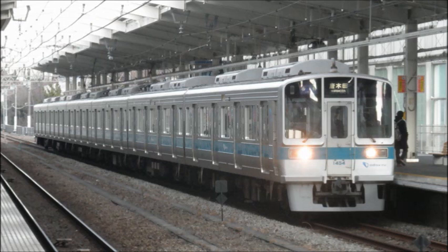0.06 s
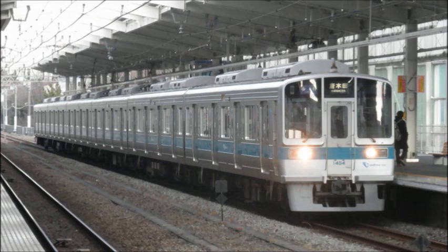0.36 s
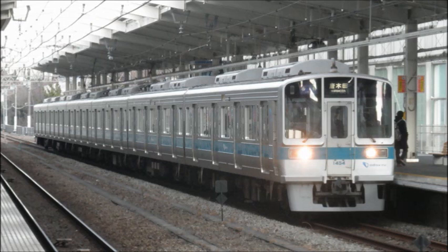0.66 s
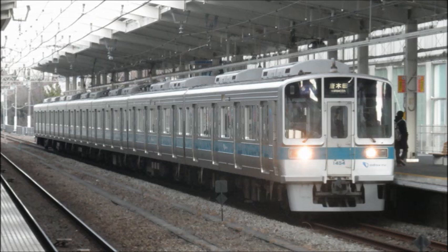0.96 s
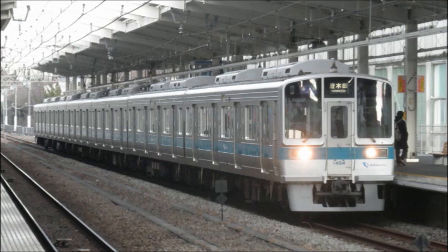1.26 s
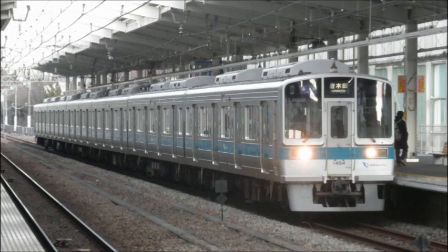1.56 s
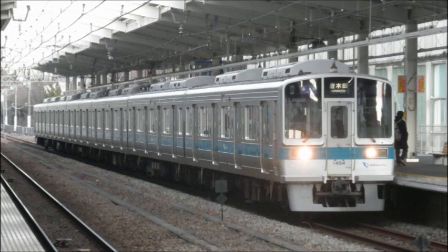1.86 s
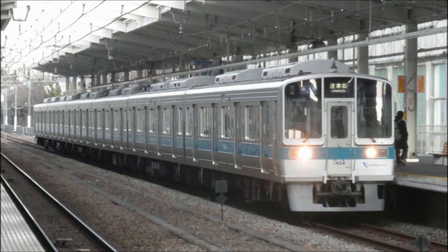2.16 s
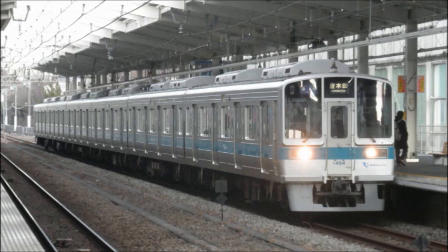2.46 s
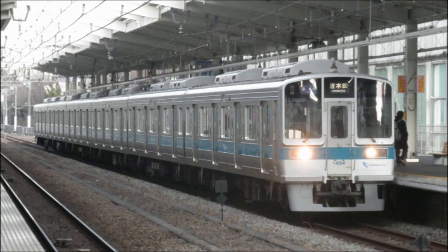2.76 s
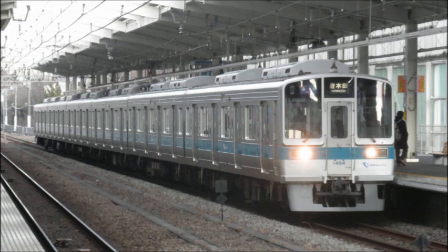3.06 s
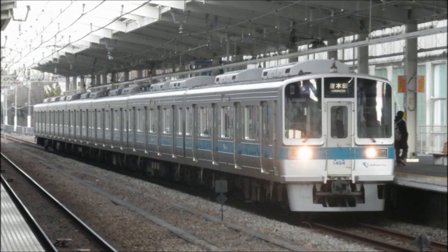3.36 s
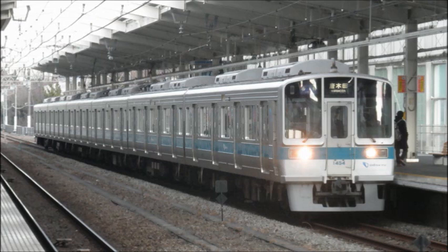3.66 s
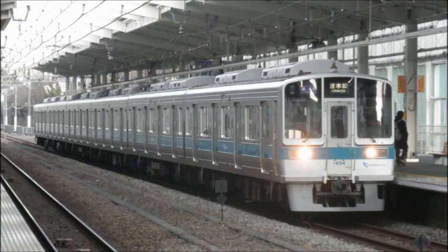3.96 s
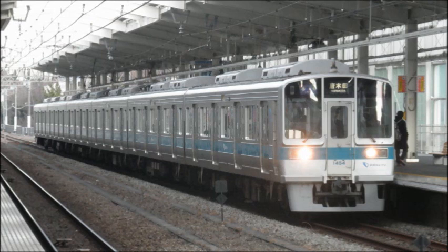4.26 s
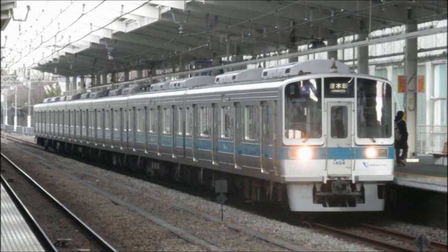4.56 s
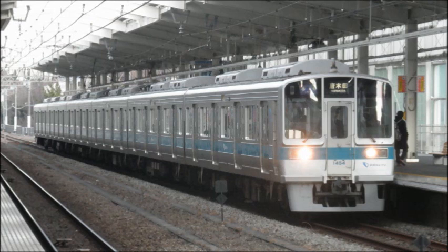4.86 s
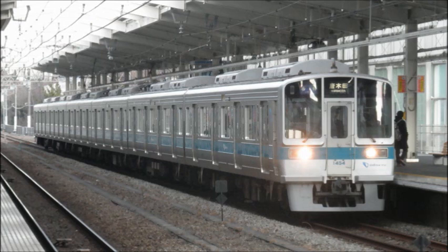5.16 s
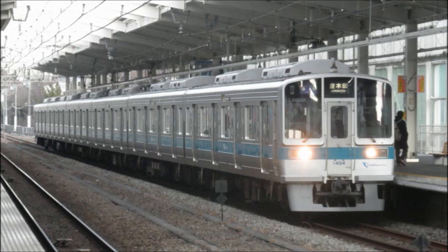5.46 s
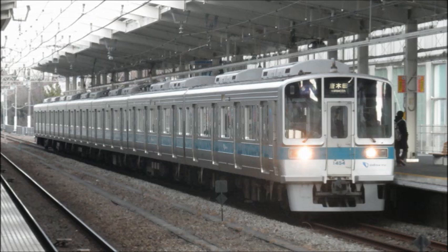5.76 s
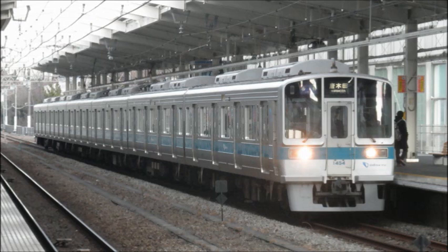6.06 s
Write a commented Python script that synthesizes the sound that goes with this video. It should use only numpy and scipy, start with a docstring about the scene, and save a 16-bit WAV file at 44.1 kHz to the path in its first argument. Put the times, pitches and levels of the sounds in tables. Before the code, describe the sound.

A hiss of compressed air and a low rumble come from an electric train waiting at a covered platform. The hiss swells, weakens with a brief groan, and ends in two short puffs and a thud. Throughout, cooling fans rush and motors hum deeply, heard in stereo from across the tracks. Close to the end, one more puff of air is followed by a muffled boom from the car body.

```python
"""The cooling blowers of a standing electric train roar, heard across the tracks at a roofed platform.
Their turbulence is coloured by duct resonances, while underfloor machines hum and beat slowly.
A jet of compressed air excites the resonances of a pipe, drops to a trickle and shuts off with two
puffs and a thud; a low rumble follows the flow. Near the end another puff precedes a dull boom,
a damped vibration of the brake gear and car body."""
import sys
import numpy as np
from scipy import signal
from scipy.fft import rfft, irfft
from scipy.io import wavfile
from scipy.ndimage import uniform_filter1d

SR = 44100
rng = np.random.default_rng(int(sys.argv[2]) if len(sys.argv) > 2 else 0)


def to_wav(sig):
    """Store sig (one row per channel, or 1-D mono) as 16-bit WAV at the path in sys.argv[1].

    Samples outside -1..1 are clipped; the rate is SR.
    """
    pcm = np.clip(np.atleast_2d(sig), -1, 1) * 32767
    pcm = np.round(pcm).astype(np.int16)
    wavfile.write(sys.argv[1], SR, pcm.T)  # frames by channels


N = 277830
TIME, BINS = np.arange(N) / SR, np.fft.rfftfreq(N, 1 / SR)


def gain_of(db):
    """Amplitude ratio: a factor of ten for every 20 dB."""
    return 10 ** (np.asarray(db) / 20)


def unit_rms(x):
    """Normalisation to unit mean power."""
    return x / np.sqrt(np.mean(abs(x) ** 2) + 1e-20)


def curve(points):
    """Interpolation of a spectrum on a logarithmic frequency axis."""
    hz, value = np.transpose(points)
    return np.interp(np.log(BINS + 1), np.log(hz + 1), value)


def resonances(modes):
    """Resonant colouring in dB: a bell-shaped peak or dip for each mode."""
    return sum(db * np.exp(-np.log(2) * (2 * (BINS - hz) / width) ** 2) for hz, width, db in modes)


def drift(rate_hz):
    """Random modulation: low-passed noise of rms 1."""
    spectrum = rfft(rng.standard_normal(N)) * (BINS > 0)
    return unit_rms(irfft(spectrum / (1 + (BINS / rate_hz) ** 4), N))


def reflections(spacing_hz):
    """Interference of reflections from train, platform and roof, modelled as random spectral ripple."""
    size = max(int(spacing_hz * N / SR), 1)
    smoothed = uniform_filter1d(rng.standard_normal(len(BINS)), size)
    return unit_rms(uniform_filter1d(smoothed, size))


def burst(start_s, rise_s, decay_s):
    """Transient envelope: a smooth rise, then exponential decay."""
    rise = np.sin(np.pi / 2 * np.clip((TIME - start_s) / rise_s, 0, 1)) ** 2
    return rise * held(start_s + rise_s, decay_s)


def held(until_s, decay_s):
    """Steady state followed by exponential decay."""
    return np.exp(-np.maximum(TIME - until_s, 0) / decay_s)


def power_sum(*gains):
    """Incoherent addition: unrelated turbulent flows add in power."""
    return np.sqrt(sum(gain ** 2 for gain in gains))


# Likeness of the left and right sound pressure: frequency_hz, correlation
STEREO_CORRELATION = [(60, 0.99), (130, 1), (290, .97), (640, 0.99), (1410, 0.64), (2200, 0.24),
                      (3100, -0.0054), (4200, -0.44), (8000, 0.11), (15000, -.08)]

def turbulence(density_db):
    """Broadband flow noise, coherent between the ears in the bass and diffuse in the treble."""
    mid, side = rfft(rng.standard_normal((2, N))) * gain_of(density_db) * np.sqrt(SR / 2)
    correlation = np.minimum(curve(STEREO_CORRELATION), .999)
    side *= np.sqrt((1 - correlation) / (1 + correlation))
    return irfft(np.array([mid + side, mid - side]), N)


# Spectrum of the rumble under the cars: frequency_hz, density_db
RUMBLE_SPECTRUM = [(10, -49), (22, -37.5), (55, -41), (90, -41.5), (130, -48.5), (240, -53), (400, -65.5),
                   (1500, -100)]
# Shudders of the car at each step of the air valve: peak_s, level_db
CAR_SHUDDERS = [(1.45, 5), (2.16, 5)]
VALVE_SHUT_S = 2.17

def rumble(rest_db=-11.5, flow_db=-2, lumpy_db=1.0):
    """Low-frequency turbulence, strong while air flows and swelling at each step of the valve."""
    flowing = gain_of(flow_db) * held(VALVE_SHUT_S, decay_s=.34)
    rise_s = .14
    shudders = [gain_of(db) * burst(peak_s - rise_s, rise_s, decay_s=.13) for peak_s, db in CAR_SHUDDERS]
    level = power_sum(gain_of(rest_db), flowing, *shudders)
    return turbulence(curve(RUMBLE_SPECTRUM)) * level * gain_of(lumpy_db * drift(rate_hz=3.4))


# Thuds and groans of brake gear and car body: start_s, pitch_hz, level_db, rise_s, decay_s, wobble_ratio
BODY_KNOCKS = [(1.427, 65, -5, 0.0076, 0.011, .05), (1.472, 738, -12.5, 0.029, 0.043, 0.058),
               (2.086, 66, -7.5, 0.03, 0.049, .1), (2.09, 827, -20.5, 0.027, .04, 0.09),
               (2.176, 451, -23, 0.012, .03, 0.08), (2.317, 167, -13, 0.01, 0.013, 0.037),
               (5.855, 377, -16.5, 0.02, 0.019, 0.036), (5.932, 50, -8, 0.039, 0.073, .02),
               (6.11, 54.5, -12.5, 0.04, .09, .03)]

def knocks():
    """Damped vibration: heavy parts shift and ring briefly, each at one slightly unsteady pitch."""
    out = np.zeros(N)
    for start_s, pitch_hz, db, rise_s, decay_s, wobble in BODY_KNOCKS:
        unsteady_hz = pitch_hz * (1 + wobble * drift(rate_hz=160))
        cycles = np.cumsum(unsteady_hz * (TIME > start_s)) / SR
        out += gain_of(db) * burst(start_s, rise_s, decay_s) * np.sin(2 * np.pi * cycles)
    return out


# Spectra of the near and the far air valve: frequency_hz, density_db
NEAR_VALVE_SPECTRUM = [(100, -41), (450, -46.5), (600, -56), (850, -53), (1200, -68), (2000, -72),
                       (2800, -75.5), (4500, -78.5), (5600, -88), (7600, -91), (10000, -100), (15000, -102)]
FAR_VALVE_SPECTRUM = [(100, -54), (380, -48), (560, -41), (900, -66), (1280, -74), (1600, -57), (1950, -68),
                      (3000, -79), (4800, -88), (7400, -87), (10500, -97), (15000, -103)]
# Releases of air: peak_s, level_db, rise_s, decay_s, far_ratio (0 near valve, 1 far valve)
AIR_PUFFS = [(2.087, 0.5, .01, 0.061, 0.19), (2.18, -2, 0.02, 0.032, 0.071),
             (5.872, -2.5, .018, 0.058, 0.96)]

def puffs():
    """Transient jet noise: valves along the train release short bursts of air."""
    out = np.zeros((2, N))
    for peak_s, db, rise_s, decay_s, far in AIR_PUFFS:
        spectrum_db = db + (1 - far) * curve(NEAR_VALVE_SPECTRUM) + far * curve(FAR_VALVE_SPECTRUM)
        out += turbulence(spectrum_db) * burst(peak_s - rise_s, rise_s, decay_s)
    return out


# Surges of the escaping air: start_s, level_db, rise_s, decay_s
FLOW_SURGES = [(.65, -4.5, 0.26, 0.32), (1.58, -9, 0.1, .06), (1.93, -7, 0.17, 0.046)]

def air_flow(jet_db=-.3, trickle_db=-10):
    """Throttling: a valve cuts a surging flow in two steps, from full jet to trickle to shut."""
    jet = gain_of(jet_db) * held(until_s=1.455, decay_s=.056)
    trickle = gain_of(trickle_db) * held(VALVE_SHUT_S, decay_s=.035)
    surges = [gain_of(db) * burst(start_s, rise_s, decay_s) for start_s, db, rise_s, decay_s in FLOW_SURGES]
    return power_sum(jet, trickle, *surges)


# Spectrum of the escaping air: frequency_hz, density_db
JET_SPECTRUM = [(400, -57), (1000, -63.5), (1750, -75.5), (2300, -72), (3200, -78.5), (4200, -85),
                (5500, -88.5), (6600, -83), (8300, -87), (11000, -88), (14200, -89), (15600, -87)]
# Resonances of the air pipe: centre_hz, width_hz, gain_db
PIPE_MODES = [(1530, 83, 4.5), (2040, 130, 4.5), (2250, 150, 4.5), (2550, 320, -4), (2874, 22, 8.5),
              (3060, 90, 5), (3230, 50, 1), (3710, 50, 6), (4860, 170, 5.5), (6575, 30, -4), (6858, 35, 1),
              (7076, 35, 2), (7750, 35, 6), (10300, 130, 2), (12200, 300, 4)]

def air_jet(ripple_db=1.0, flutter_db=.6):
    """Pipe resonance: a jet of compressed air excites the pipe's modes until the valve shuts."""
    spectrum_db = curve(JET_SPECTRUM) + resonances(PIPE_MODES) + ripple_db * reflections(spacing_hz=21)
    return turbulence(spectrum_db) * air_flow() * gain_of(flutter_db * drift(rate_hz=13))


def rotor_tones(rows):
    """Periodic forcing: rotating machines radiate tones, and part of each wavers in the moving air."""
    out = np.zeros(N)
    for pitch_hz, db, waver, rate_hz in rows:
        wavering = unit_rms(drift(rate_hz) + 1j * drift(rate_hz))
        amplitude = np.sqrt(1 - waver ** 2) + waver * wavering
        carrier = np.exp(2j * np.pi * (pitch_hz * TIME + rng.random()))
        out += gain_of(db) * unit_rms((amplitude * carrier).real)
    return out


def beating(in_step_s, period_s, second_ratio):
    """Beats: two machines at almost the same speed pass in and out of phase."""
    second_machine = second_ratio * np.exp(2j * np.pi * (TIME - in_step_s) / period_s)
    return abs(1 + second_machine) / np.hypot(1, second_ratio)


# Tones of motor shafts, fans and whining blades: pitch_hz, level_db, waver_ratio, waver_rate_hz
SHAFT_PARTIALS = [(29, -30, 0.1, 1.3), (57.9, -26, 0.13, 1.2)]
FAN_PARTIALS = [(147.5, -34, 0.79, 2.5), (150.4, -28, 0.26, 2.1)]
BLADE_PARTIALS = [(904.8, -40.7, .5, 4), (1056.5, -40.8, .4, 3), (2010, -63, .7, 8)]  # the fan's sixth and seventh orders and a faint upper tone

def hum(drone_db=.6, fan_db=1.4, fan_db_per_s=-.5):
    """Rotational tones: a deep motor drone and a sinking fan hum, both beating, under a thin whine."""
    drone = rotor_tones(SHAFT_PARTIALS) * beating(in_step_s=1.2, period_s=2.7, second_ratio=.2)
    fans = rotor_tones(FAN_PARTIALS) * beating(in_step_s=1, period_s=2.65, second_ratio=.26)
    whine = rotor_tones(BLADE_PARTIALS)
    return drone * gain_of(drone_db) + fans * gain_of(fan_db + fan_db_per_s * TIME) + whine


# Spectrum of the cooling blowers: frequency_hz, density_db
BLOWER_SPECTRUM = [(10, -62), (25, -44.5), (70, -46.5), (115, -48), (175, -44), (300, -53), (680, -51.5),
                   (1150, -61), (1700, -74.5), (2800, -84.5), (4200, -93.5), (6300, -95), (7200, -100),
                   (15500, -105)]
# Resonances of the ducts and the car underside: centre_hz, width_hz, gain_db
DUCT_MODES = [(222, 17, -0.8), (250, 37, 3), (368, 43, 2.5), (692, 90, 1.5), (756, 41, -3),
              (980, 130, -1.5), (1155, 74, 3), (1283, 55, 2), (2100, 310, 3), (3200, 440, 1),
              (6100, 900, -0.5)]

def blowers(ripple_db=.5, flutter_db=-.06):
    """Source and filter: steady fan turbulence is coloured by duct resonances and flutters slightly."""
    spectrum_db = curve(BLOWER_SPECTRUM) + resonances(DUCT_MODES) + ripple_db * reflections(spacing_hz=20)
    return turbulence(spectrum_db) * gain_of(flutter_db * drift(rate_hz=11))


def scene():
    """Superposition: the sound pressures of all the train's equipment add."""
    return blowers() + hum() + air_jet() + puffs() + rumble() + knocks()


# Balance of the microphone pair: frequency_hz, left_minus_right_db
STEREO_BALANCE = [(60, 1), (110, 1.0), (200, 1.0), (380, 0.5), (700, 2), (1290, -1.0), (2380, -1),
                  (4400, -1), (8120, -0.5), (15000, -1.0)]

def record(dry, cutoff_hz=15800):
    """Linear filtering: a slight left-right tilt by band, then soft ends and a low-pass band limit."""
    balance_db = np.array([[.5], [-.5]]) * curve(STEREO_BALANCE)
    tilted = irfft(rfft(dry) * gain_of(balance_db), N)
    fades = signal.windows.tukey(N, .001)
    lowpass = signal.firwin(1023, cutoff_hz, window=("kaiser", 9), fs=SR)
    return signal.oaconvolve(tilted * fades, lowpass[None], "same", axes=1)


dry = scene()
out = record(dry)
to_wav(out)
```